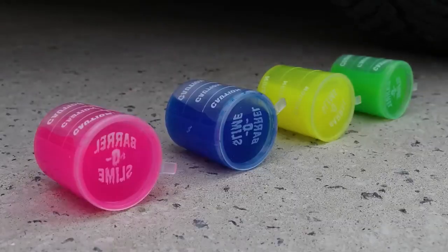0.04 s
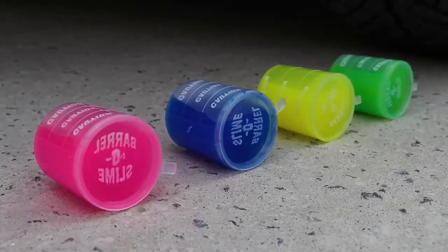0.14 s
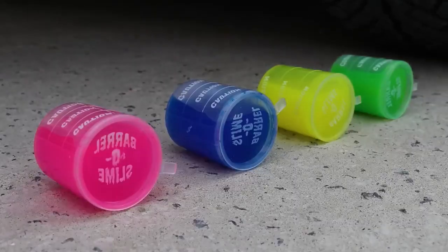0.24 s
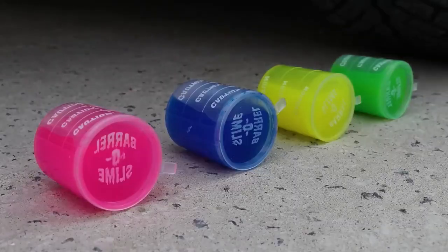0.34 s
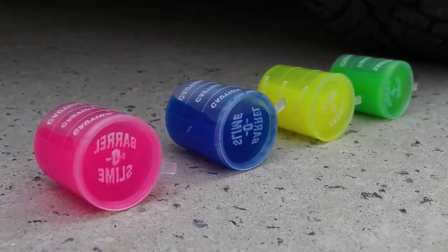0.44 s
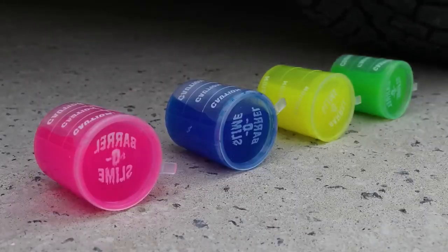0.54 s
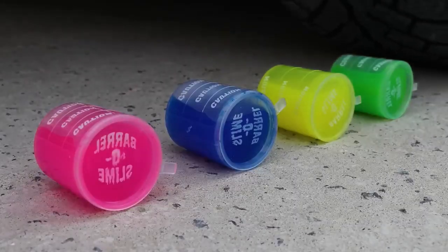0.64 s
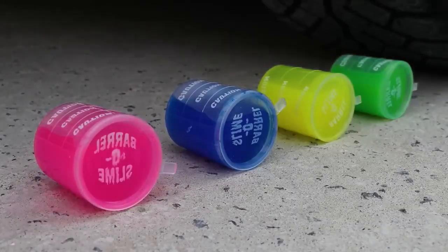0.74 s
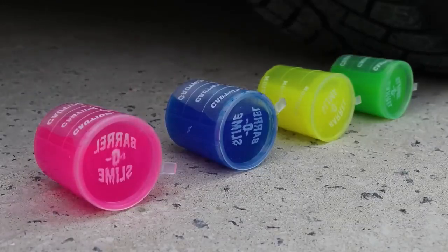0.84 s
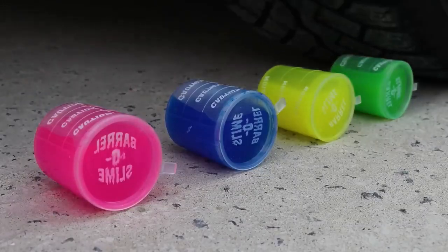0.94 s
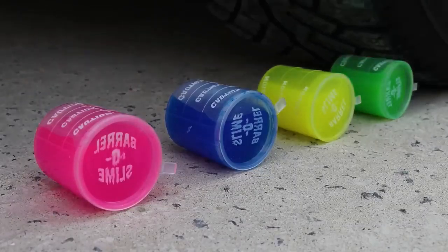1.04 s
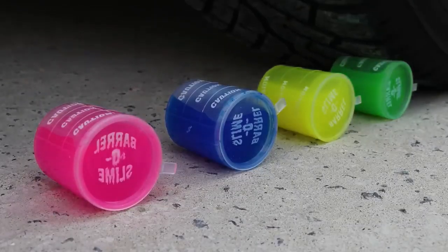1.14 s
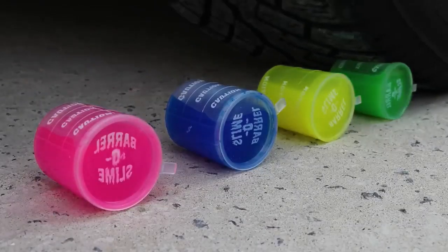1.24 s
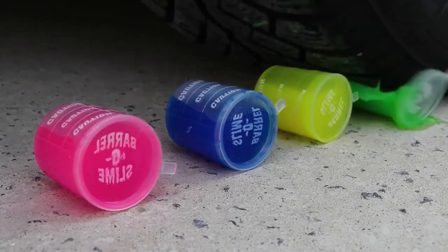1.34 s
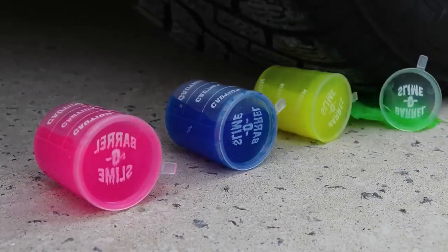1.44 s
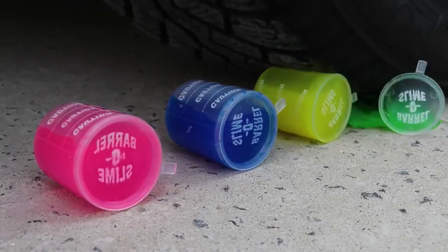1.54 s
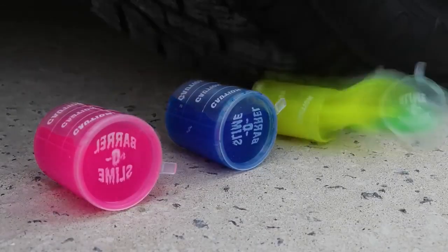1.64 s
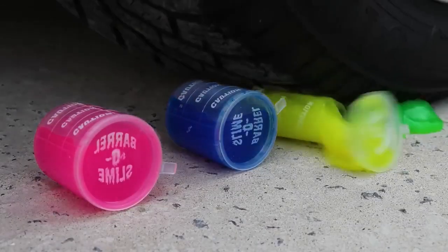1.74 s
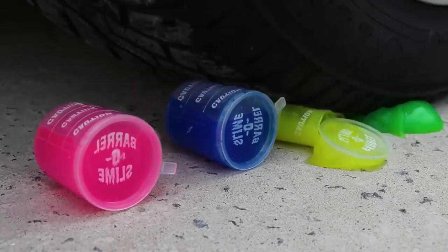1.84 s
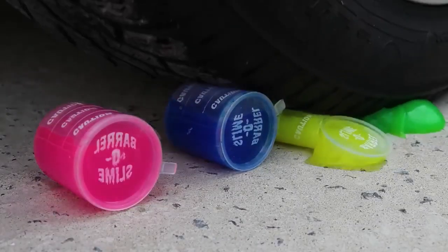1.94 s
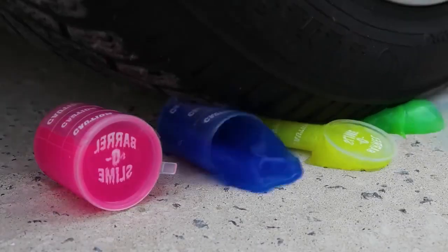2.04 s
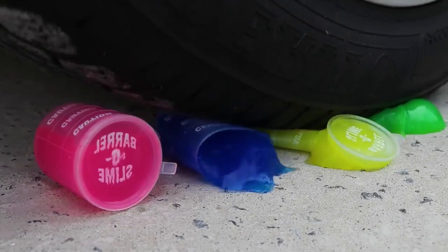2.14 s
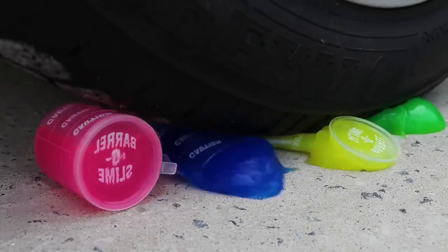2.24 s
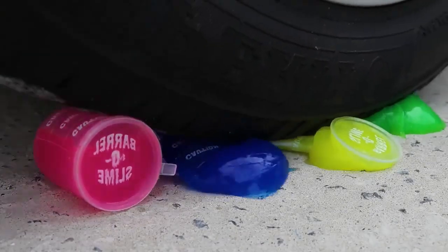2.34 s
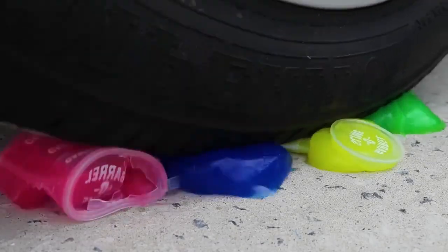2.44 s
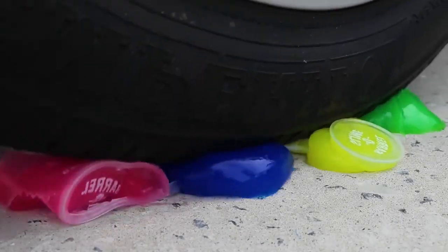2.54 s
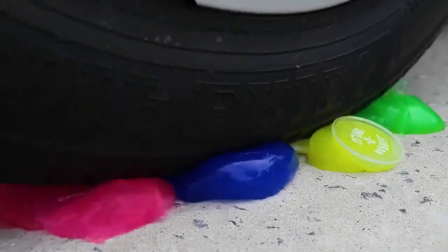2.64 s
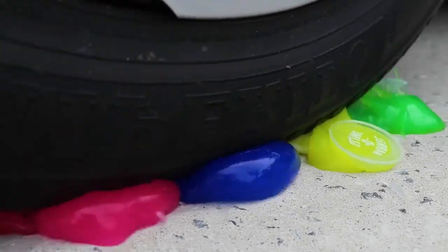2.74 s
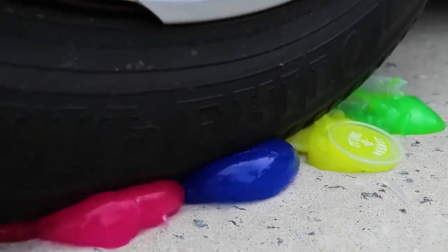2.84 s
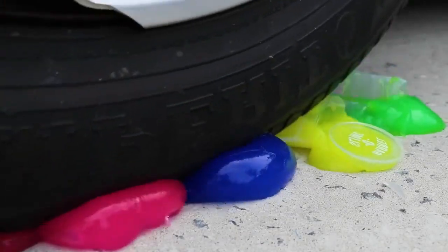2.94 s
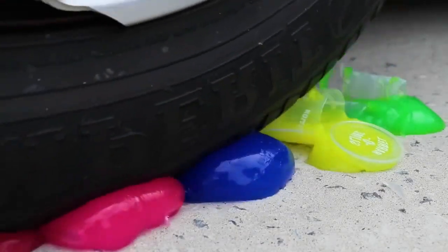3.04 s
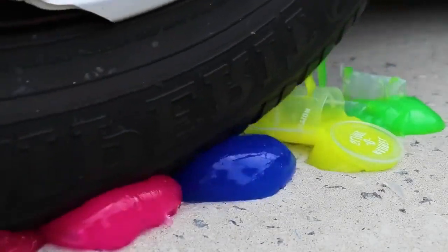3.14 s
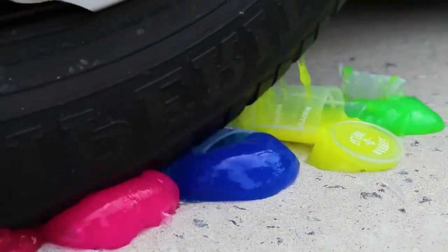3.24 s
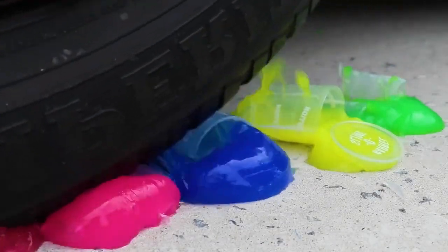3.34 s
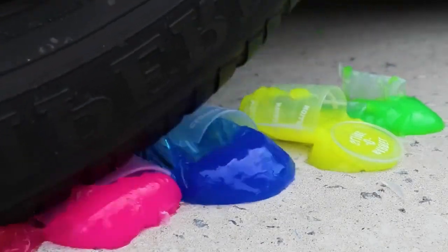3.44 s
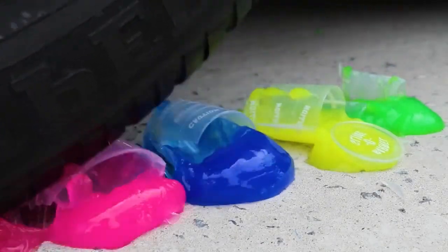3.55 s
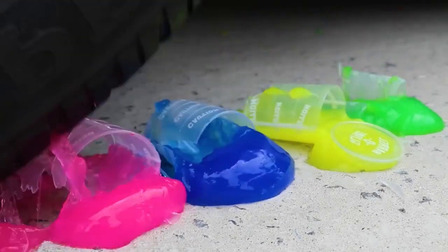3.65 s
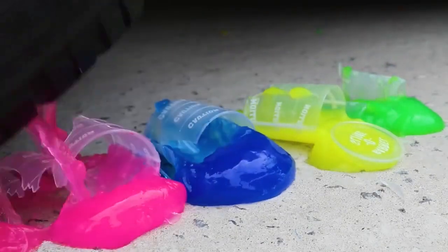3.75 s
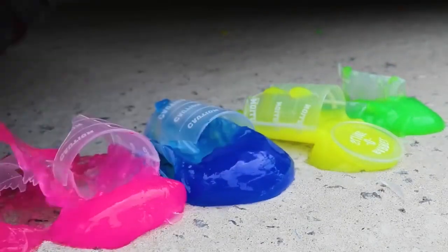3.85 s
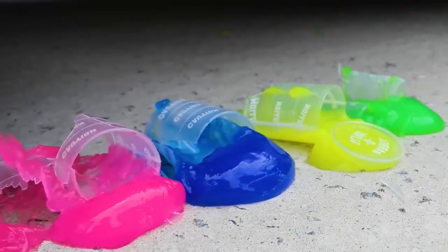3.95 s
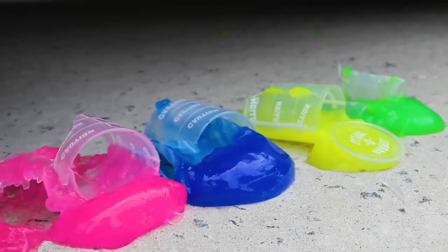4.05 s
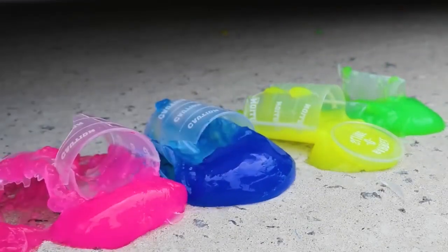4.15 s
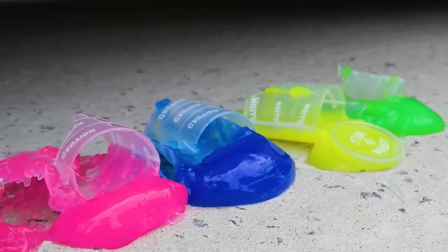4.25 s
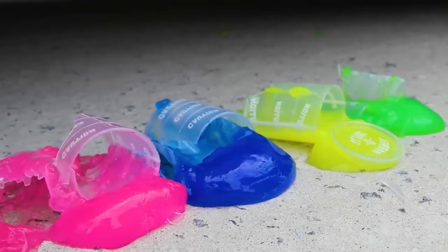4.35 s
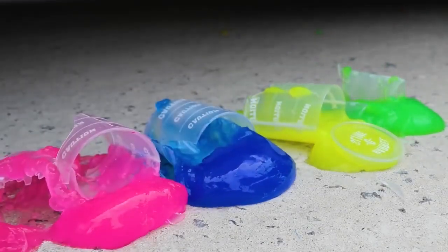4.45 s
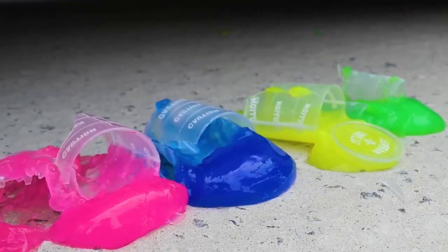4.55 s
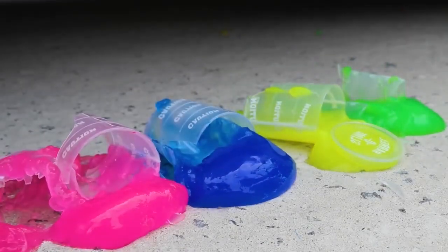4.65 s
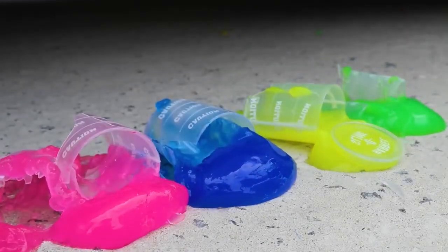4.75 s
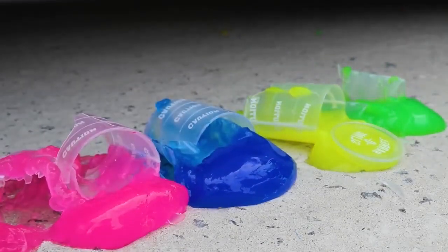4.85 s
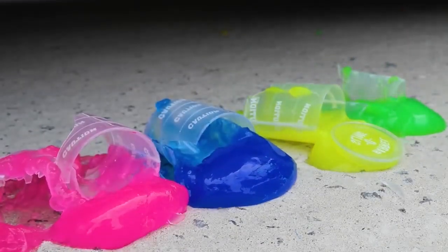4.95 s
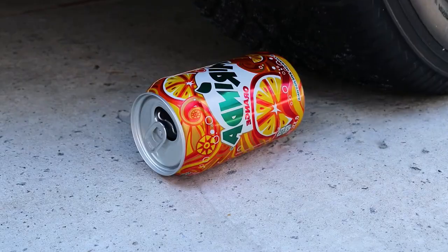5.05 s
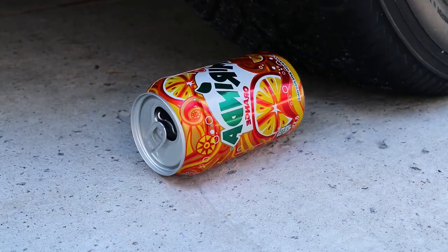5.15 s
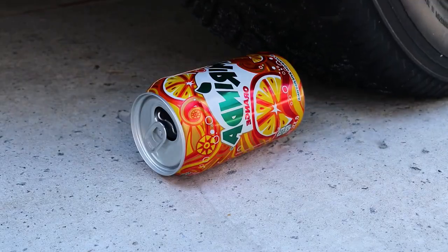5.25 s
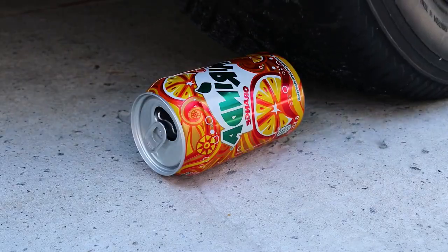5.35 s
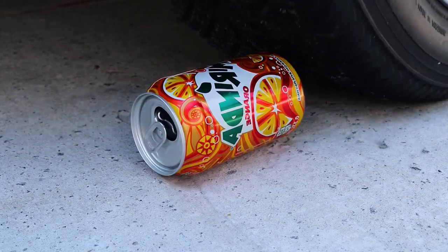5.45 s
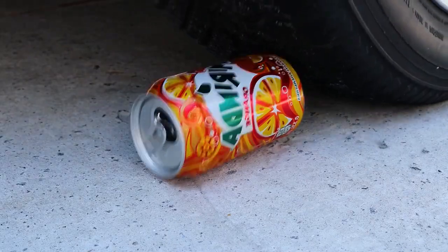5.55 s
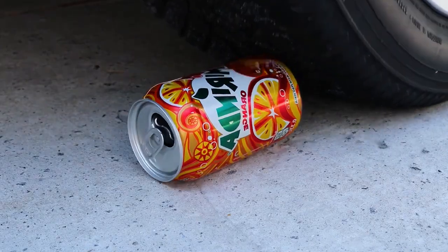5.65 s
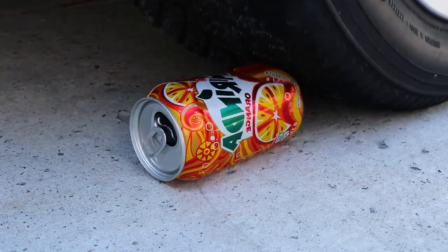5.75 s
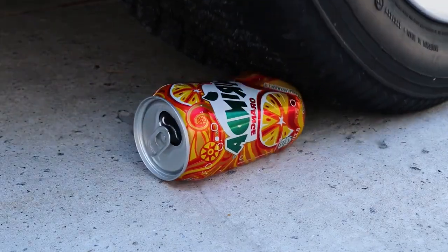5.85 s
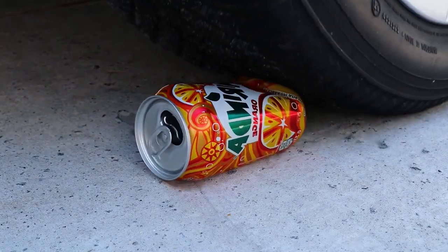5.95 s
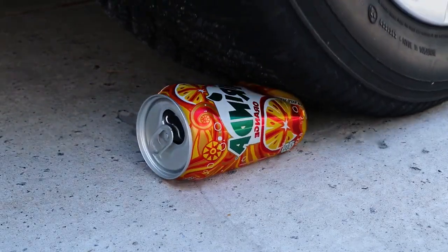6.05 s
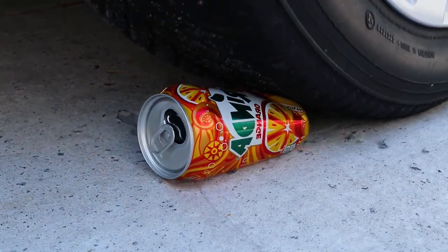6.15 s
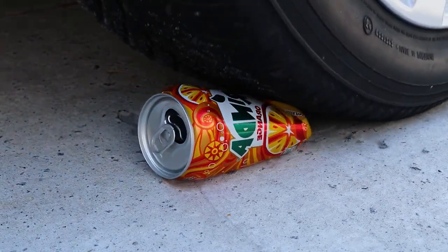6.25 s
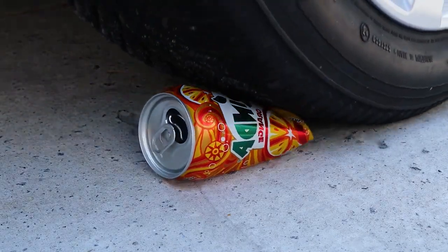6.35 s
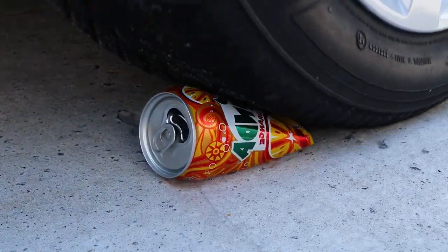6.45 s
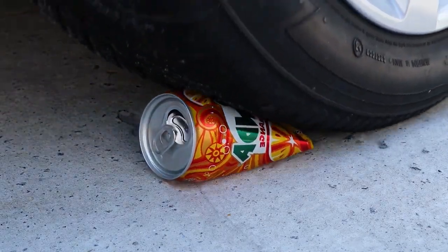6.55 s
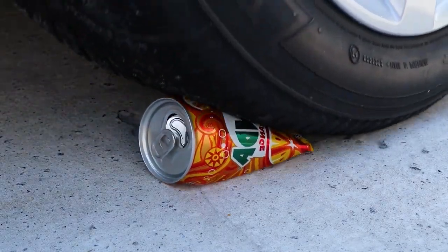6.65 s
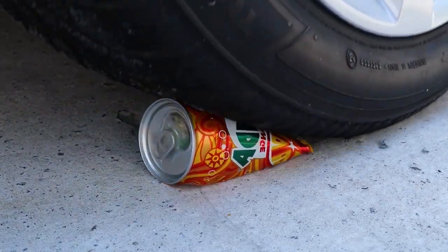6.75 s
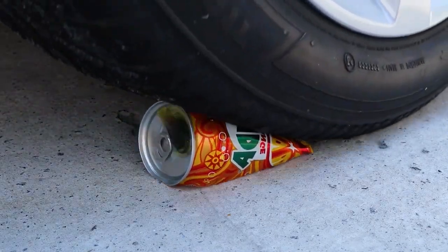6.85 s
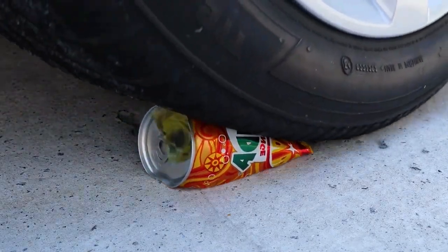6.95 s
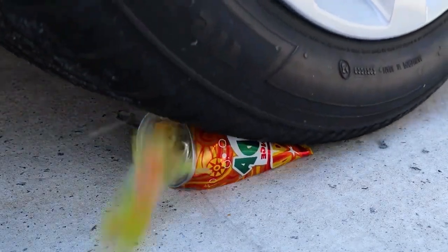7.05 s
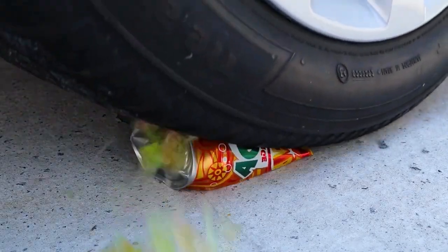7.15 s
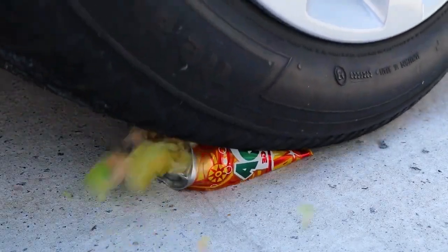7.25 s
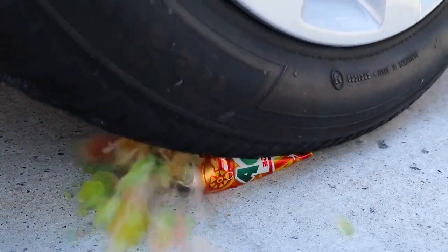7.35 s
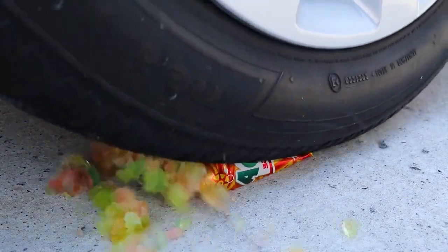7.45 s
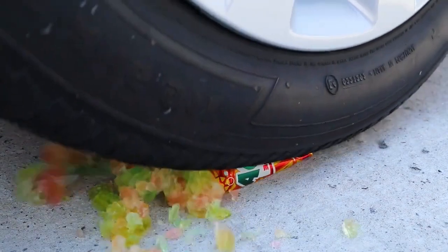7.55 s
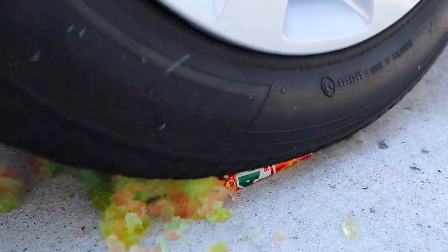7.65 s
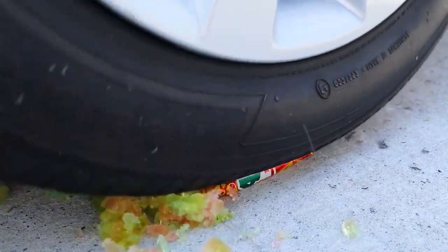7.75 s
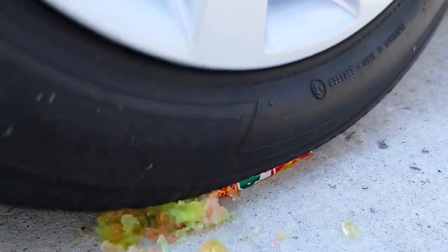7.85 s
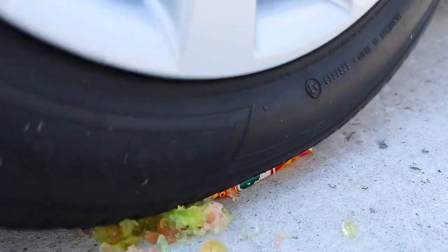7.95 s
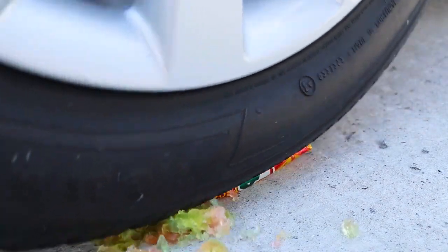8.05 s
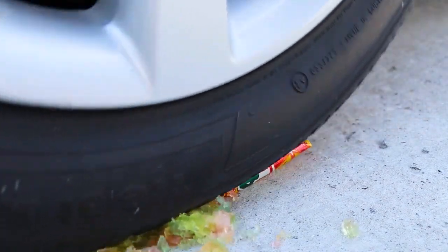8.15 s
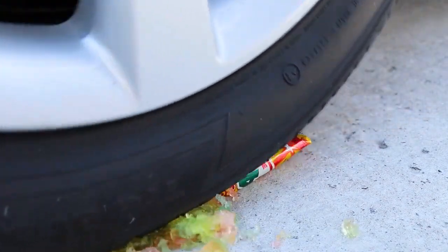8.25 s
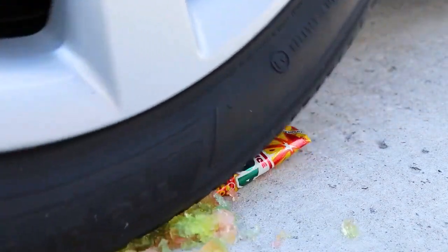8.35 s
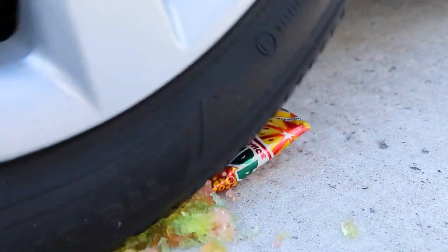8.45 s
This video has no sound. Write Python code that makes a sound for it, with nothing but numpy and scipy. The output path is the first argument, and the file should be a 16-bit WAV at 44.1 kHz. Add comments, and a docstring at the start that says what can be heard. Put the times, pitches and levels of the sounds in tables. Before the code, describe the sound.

A car tyre slowly bursts slime-filled plastic tubs with loud pops and brittle snaps, then after a faded pause crumples a metal can of wet beads.

```python
"""Tyre crushing tubs and a can

A car tyre creeps over slime-filled plastic tubs on concrete, then, after a fade, over a can of jelly beads.
Lids burst as damped thuds and torn noise that shake the tyre's carcass; its air hums on tabled levels.
Plastic snaps and metal buckles are noise clicks with decaying modes; squeezes are dense random grains.
A thin brake squeak, rasps, grit, outdoor air and a short yard tail complete it; loud bursts clip.
"""
import sys
import numpy as np
from scipy import signal
from scipy.fft import rfft, irfft
from scipy.io import wavfile
from scipy.ndimage import uniform_filter1d

SR = 44100
rng = np.random.default_rng(int(sys.argv[2]) if len(sys.argv) > 2 else 0)


def wav_out(sig):
    """Save sig, one row per channel (or a flat mono array), as 16-bit PCM at SR to the path in sys.argv[1]."""
    wavfile.write(sys.argv[1], SR, np.round(np.clip(np.atleast_2d(sig).T, -1, 1) * 32767).astype(np.int16))


N = 375291

# Bursts of lids and can: (t/s, thud level/dB, thud f/Hz, tearing level/dB, tearing length/ms,
# tyre shudder level re thud/dB, push of air level/dB)
BURSTS = [(1.389, -2.5, 376, -2, 4.8, -12.5, -29), (1.783, 0, 411, -2.5, 5, -15.5, -14),
          (2.1333, -3, 377, -1.5, 5.3, -16.5, -9), (2.306, -25.5, 128, -16.5, 5.8, -4, -33),
          (2.537, -2.5, 323, -2.5, 6.4, -14, -5.5), (2.698, -17, 398, -21, 5.5, -11, -36),
          (6.231, -28, 117, -47, 9.8, -13.5, -42), (7.08, -12, 255, -27.5, 4.2, -11.5, -39),
          (7.168, -8.5, 246, -24.5, 7.7, -13.5, -36), (7.378, -10, 270, -27, 8, -12, -45)]
# Carcass modes of the tyre: (f/Hz, level/dB, t60/s)
CARCASS_MODES = [(91, -11.5, 0.2), (126.3, -7, 0.36), (170, -2, 0.14), (271.6, -3.5, 0.18), (918, 9, 0.026)]
PUSH_S = 0.0028  # time constant of the push of air
# Snaps of the tub walls: (t/s, peak level/dB, ring f/Hz, treble level re peak/dB)
SNAPS = [(1.204, -36, 690, -3.5), (1.266, -37.5, 900, -2), (1.4173, -14, 1630, -8), (1.525, -12, 1660, -11),
         (1.5318, -8.5, 1660, 5.5), (1.5552, -19, 3740, -4.5), (1.6243, -28, 3120, 6),
         (1.76, 0.5, 1860, -36.5), (1.8426, -14.5, 1900, -17), (1.906, 1, 2460, 1),
         (1.9188, -0.5, 2260, -1), (1.9687, -18, 1440, -34.5), (1.9951, -6, 2100, -5.5),
         (2.0342, -12, 1780, -11), (2.0864, -11, 950, -6.5), (2.106, -12.5, 1250, -23.5),
         (2.1613, 5, 2580, 1.5), (2.267, -18.5, 2200, 0), (2.273, -8, 1940, -20), (2.2953, -24, 2020, 4.5),
         (2.3073, 2.5, 2470, 4), (2.4669, -9, 3300, -27.5), (2.523, -10, 2330, -6.5),
         (2.567, -11.5, 2050, -1.5), (2.6119, -16, 2700, 3), (2.6868, -10, 1630, -3),
         (2.697, -5.5, 2370, 6), (2.7148, -13, 2600.0, -17.5), (2.755, -1, 4730, -24.5),
         (2.7765, -23, 3470, -13.5), (2.8021, -4, 1540, 1.5), (2.8904, -2, 1940, -8.5),
         (2.9457, -21, 5260, -12.5), (2.9722, -22, 4600, -5.5), (2.9936, -2, 2100, -0.5),
         (3.0879, 0.5, 3040, -27.5), (3.1099, -19.5, 2400, -22), (3.118, -18, 2530, -11),
         (3.139, -23, 3470, -15), (3.1695, -25, 1720, -18.5), (3.177, -14, 2020, -14),
         (3.199, -25, 2620, -10), (3.2203, -24, 2400, -5), (3.24, -28.5, 1640, 1),
         (3.295, -23.5, 2370, -5.5), (3.3033, -25, 2670, -4), (3.3478, -35, 1650, 7.5),
         (3.3932, -16, 2140, 3), (3.4315, -23, 3600, -2), (3.4386, -9.5, 1780, -6.5),
         (3.445, -13, 2840, -13), (3.469, -22.5, 4800, 3.5), (3.499, -30, 3740, 8.5),
         (3.5449, -25.5, 1650, -26), (3.5886, -16, 1480, -13.5), (3.621, -27, 1220, -35),
         (3.7, -35.5, 2190, 2), (4.094, -35, 2920, -4.5)]
TUB_T60_S, TICK_T60_S = 0.0087, 0.0076
# Buckles of the can wall: (t/s, click peak level/dB, click centre f/Hz, shell ring level re click/dB)
BUCKLES = [(5.646, -46.5, 1950, 2), (5.682, -38.5, 2010, 4.5), (5.7157, -45.5, 1690, 18.5),
           (5.728, -16.5, 2800, -15), (5.7378, -11, 1980, -8.5), (5.7734, -2.5, 2620, -17.5),
           (5.8552, -13.5, 1720, -17), (5.8934, -17, 5500, -19), (5.914, -29, 1970.0, -7),
           (5.9479, -7.5, 3400, -15), (6.0226, -36.5, 2330, 7), (6.21, -26.5, 1790, -6.5),
           (6.254, -30.5, 2600, -11.5), (6.337, -27, 4640, -20.5), (6.487, -35, 2620, -3),
           (6.5146, -5, 5800, -12.5), (6.5461, -23, 2380, 2), (6.6274, -2, 3700, -15),
           (6.653, -18, 5070, -16), (6.6788, -22.5, 4580, -15), (6.7683, -25.5, 5200, -7),
           (6.8472, -14.5, 3340, -7.5), (6.8955, -13.5, 3620, -20), (6.9414, -19.5, 6600, -34),
           (6.9536, -20.5, 6930, -40), (7.0356, -19, 6900, -23), (7.0656, -18.5, 1820, 2),
           (7.0846, -17.5, 4750, 0), (7.1106, -11, 3780, -6), (7.239, -24, 5800, -22),
           (7.3784, -12.5, 1880, 4), (7.456, -19, 5000, -33), (7.5563, -26, 5600.0, -8.5),
           (7.8081, -32, 2220.0, 5.5), (7.8467, -31, 5000, -10), (7.882, -7.5, 4060, -12),
           (7.8953, -17.5, 2550, -1.5), (7.9624, -17, 1720, 5.5), (7.9905, -21.5, 2800, -5),
           (8.2576, -23.5, 5700, -31), (8.3213, -26.5, 2820, -32), (8.491, -22, 3330, -16)]
# Shell ring as the can flattens: (t/s, f/Hz, t60/s)
CAN_SHELL = [(5.599, 617, 0.068), (5.78, 698, 0.074), (6.02, 797, 0.038), (6.499, 1064, 0.03),
             (6.65, 1374, 0.019), (6.849, 786, 0.006), (7.9, 1030, 0.0059)]
# Stiffer modes of the can ends: (f/Hz, level re click/dB, t60/s)
CAN_END_MODES = [(2390, -14.5, 0.046), (4730, -17, 0.018)]
# The flattened can slips off the tread in jerks: (t/s, jerk rate/(1/s), gain level/dB)
CREAK = [(8.122, 82, -24), (8.16, 106, -21), (8.185, 198, -29), (8.215, 470, -34), (8.23, 280, -47)]
# Fine crackle as the tread squeezes: (peak t/s, crunch level/dB, wet fizz level/dB, decay/(dB/s))
SQUEEZES = [(1.43, -36.5, -58, 65), (1.88, -30.5, -48, 190), (1.96, -35, -45.5, 200), (2.17, -62, -52, 64),
            (2.29, -34, -36.5, 300), (2.56, -34, -46, 125), (2.762, -30, -37, 189), (2.9, -56, -53.5, 30),
            (3.12, -52, -54, 47), (3.422, -39.5, -47.5, 168), (3.7, -48, -68.5, 168.5),
            (5.729, -42, -55, 52), (5.9, -46.5, -47, 83), (6.31, -61, -57.5, 109.5),
            (6.65, -44.5, -46, 128), (7.095, -41, -37, 291), (7.303, -45, -46, 81), (7.39, -49, -38.5, 75),
            (7.649, -47, -48.5, 34), (8.13, -39.5, -48, 96), (8.27, -56, -52.5, 36)]
# Colours of grain: (low f/Hz, high f/Hz, share of fizz 0-1, relative level/dB); band() caps the high edge
GRAINS = [(454, 1250, 0, -0.5), (1300, 2500, 0.06, -2.5), (2600, 4400, 0.7, -5), (4500, 6900, 1, -1),
          (7000, 10000, 1, -4), (10100, 42000, 0.92, -3.5)]
BUILD_UP_DB_PER_S = 328.5
# Levels of the hum in the tyre's air, where it swells or drops, decaying in between:
# (t/s, level/dB of each mode)
HUM_LEVELS = [(1.39, -28.5, -31, -30), (1.78, -36, -25, -28.5), (1.91, -46, -39.5, -44.5),
              (2.13, -35, -27, -30.5), (2.3, -47.5, -48, -46), (2.53, -41, -32.5, -27),
              (2.69, -48, -46, -35), (2.951, -59, -44, -50), (5.769, -63, -52.5, -52),
              (6.03, -78, -75.5, -80), (7.07, -59, -36, -38), (7.17, -31.5, -39, -40),
              (7.23, -60, -44.5, -48), (7.38, -43, -47.5, -47), ]
# Air modes in the tyre, the lowest split by the load: (f/Hz, t60/s, waver/Hz)
AIR_MODES = [(234, 1.4, 3.0), (247.4, 2.1, 3.), (475.6, 0.5, 9.)]
HUM_SLEW_S = 0.035
# Rasps of rolling tread, squelching slime and creased metal:
# (peak t/s, level/dB, decay/(dB/s), centre f/Hz, width f/Hz)
RASPS = [(.98, -66, 12, 2130, 150), (3.278, -38, 500, 1000, 800), (6.315, -52, 140, 8700, 800),
         (8.464, -39, 700, 1625, 560)]
# Swells of the brake squeak: (peak t/s, level/dB, decay/(dB/s))
SQUEAK = [(4.515, -46, 400), (4.6, -38.5, 150), (4.71, -50, 330)]
SQUEAK_HZ = 12283.0
# Bright ticks of grit and thin creases under the tread: (t/s, peak level/dB)
GRIT = [(.5392, -40), (1.099, -41), (1.5185, -22), (2.2446, -25), (2.9273, -25.5), (3.229, -26),
        (3.41, -20), (5.3448, -48), (5.5586, -46), (5.6586, -39), (6.097, -38), (6.1364, -37), (6.221, -36),
        (6.2926, -37), (6.4478, -33), (6.5625, -32.5), (6.594, -30), (6.7234, -34), (6.878, -31),
        (7.0512, -28), (7.3435, -31)]
# Outdoor air with the idling car, fading out and in between the scenes:
# (t/s, air level/dB, wind rumble level/dB)
AIR_LEVELS = [(0, -60, -76), (.6, -59, -68), (1.3, -59.5, -57), (3.6, -56, -57), (4.0, -54.5, -59.5),
              (4.4, -53, -63), (4.75, -55.5, -67.5), (5.03, -74, -86.5), (5.2, -64.5, -75.5),
              (5.6, -60.5, -76.5), (7.0, -56, -70.5), (8.51, -51.5, -100)]
# Relative spectrum of the outdoor air: (f/Hz, density level/dB per Hz)
AIR_SPECTRUM = [(41, -14), (70, -1.5), (274, -5), (394, -4.5), (593, -8.5), (853, -8), (1470, -7.5),
                (3820, -20), (7060, -23), (16000, -36.5)]
# Thin whines of the idling car:
# (f/Hz, width f/Hz, level re air/dB in the first scene, the same in the second)
WHINES = [(2120, 190, -12.5, -25.5), (10540, 12, -24.5, -52)]
SECOND_SCENE_S = 5.03
YARD_T60_S, YARD_DB, YARD_HZ = 0.27, -25.5, 4800
TOP_HZ = 16350


def undb(db):
    """Level definition: amplitude ratio from decibels."""
    return 10 ** (np.asarray(db) / 20)


def unit(x):
    """Normalisation to unit root-mean-square amplitude."""
    return x / np.sqrt(np.mean(x ** 2))


def peak(x, db):
    """Normalisation of the largest amplitude to a peak level."""
    return x * undb(db) / abs(x).max()


def band(x, lo_hz, hi_hz):
    """Band-pass filtering, with the upper edge kept below the Nyquist limit."""
    edges = [lo_hz, min(hi_hz, .45 * SR)]
    return signal.sosfilt(signal.butter(2, edges, "band", fs=SR, output="sos"), x)


def fade(s, t60):
    """Exponential damping: amplitude falls 60 dB in t60 seconds."""
    return np.exp(-np.log(1000) * s / t60)


def sine(hz, s):
    """Simple harmonic motion of unit amplitude."""
    return np.sin(2 * np.pi * hz * s)


def add(track, at_s, sound):
    """Superposition of a sound on a track from a given time."""
    i = int(at_s * SR)
    track[i:i + len(sound)] += sound[:N - i]


def walk(rate):
    """Slow random modulation: levels held for 1 / rate seconds and slewed twice."""
    k = int(SR / rate)
    steps = np.repeat(rng.standard_normal(N // k + 1), k)
    return uniform_filter1d(uniform_filter1d(steps, k), k)[:N]


def curve(table, column):
    """Level interpolation in dB over time, -120 dB outside the table."""
    s, rows = np.arange(N) / SR, np.array(table)
    out = np.full(N, -120.0)
    on = (s >= rows[0, 0]) & (s <= rows[-1, 0])
    out[on] = np.interp(s[on], rows[:, 0], rows[:, column])
    return uniform_filter1d(out, 441)  # 10 ms smoothing


def swells(at_s, db, fall):
    """Energy summation in dB of swells that rise and decay at steady rates in dB per second."""
    s = np.arange(0, N + 100, 100)[:, None] / SR
    late = s - np.asarray(at_s)
    level = db - np.where(late > 0, late * fall, -late * BUILD_UP_DB_PER_S)
    total = 10 * np.log10(np.sum(undb(2 * level), axis=1) + 1e-14)
    return np.interp(np.arange(N) / SR, s[:, 0], total)


def ragged(noise, count=90):
    """Intermittent fracture: an uneven gain in steps of about 2 ms."""
    return np.repeat(np.minimum(noise[::count] ** 2, 3), count)[:len(noise)]


def click(noise, s, hz, t60, below=.45, above=2.2):
    """Impulsive fracture: band noise around hz with a fainter crumbling tail."""
    crumble = 0.089 * ragged(noise) * fade(s, 7.9 * t60)
    return band(noise * (fade(s, t60) + crumble), below * hz, above * hz)


def tone(hz, db, waver=0.):
    """Frequency modulation: a sine on a level curve whose pitch wavers by a few Hz."""
    phase = 2 * np.pi * np.cumsum(hz + waver * walk(22)) / SR
    return np.sqrt(2) * undb(db) * np.sin(phase)


def bursts():
    """Pressure release: a push of air, a damped thud, tearing noise and excited carcass modes."""
    out, s = np.zeros(N), np.arange(SR // 2) / SR
    noises = rng.standard_normal((len(BURSTS), 2, len(s)))
    for (at_s, db, hz, tear_db, tear_ms, shudder_db, push_db), noise in zip(BURSTS, noises):
        # a thud lasts a few cycles; higher-pitched thuds are rougher
        rough = hz / 309.0 * unit(band(noise[0], .5 * hz, 4.46 * hz)) * fade(s, 0.045)
        thud = fade(s, 15.0 / hz) * sine(hz, s) + rough
        # the carcass modes are shaken unevenly, so each is part tone, part narrow noise
        shudder = np.zeros(len(s))
        for f, level_db, t60 in CARCASS_MODES:
            mode_tone = np.sin(2 * np.pi * (f * s + rng.random()))
            mode_noise = 1.3 * unit(band(noise[1], .8 * f, 1.2 * f))
            shudder += undb(level_db) * fade(s, t60) * (mode_tone + mode_noise)
        shudder *= 1 - fade(s, 0.033)  # gradual onset
        push = (1 - s / PUSH_S / 2) * s / PUSH_S * np.exp(1 - s / PUSH_S)
        # tearing holds its level, then drops to a duller, splashy tail
        hold = np.exp(-(1e3 * s / tear_ms) ** 3) * (1 - fade(s, .004))
        splash = (0.16 * fade(s, 0.12) + 0.011 * fade(s, 0.62)) * (0.68 + 0.47 * ragged(noise[0]))
        tear = unit(band(noise[1], 1400, 16000) + 3.0 * band(noise[1], 780, 1900)) * hold
        tear += unit(band(noise[0], 1200, 8700)) * splash
        body = undb(db) * band(thud + undb(shudder_db) * shudder, 63.0, 13000)
        add(out, at_s, body + undb(tear_db) * tear + undb(push_db) * push)
    return out


def snaps():
    """Brittle fracture: a few cycles of the plastic wall inside a broad click, plus a bright tick."""
    out, s = np.zeros(N), np.arange(3072) / SR
    noises = rng.standard_normal((len(SNAPS), 2, len(s)))
    for (at_s, db, hz, treble_db), noise in zip(SNAPS, noises):
        wall = click(noise[0], s, hz, TUB_T60_S, above=1.7)
        wall += 1.7 * fade(s, 13.0 / hz) * sine(hz, s)
        # another panel rings up to an octave away
        panel_hz = hz * 2 ** np.tanh(noise[1, -1])
        wall += .5 * fade(s, 0.0069) * sine(panel_hz, s)
        tick = click(noise[1], s, 5200.0, TICK_T60_S, below=0.58, above=1.78)
        add(out, at_s, peak(band(wall, 0.17 * hz, 14000), db) + peak(tick, db + treble_db))
    return out


def buckles():
    """Shell instability: a dry wide click excites the can wall, a dented neighbour mode and the ends."""
    out, s = np.zeros(N), np.arange(4096) / SR
    when, pitch, decay = np.transpose(CAN_SHELL)
    noises = rng.standard_normal((len(BUCKLES), 2, len(s)))
    for (at_s, db, hz, ring_db), noise in zip(BUCKLES, noises):
        shell_hz = np.interp(at_s, when, pitch)
        shell_t60 = np.interp(at_s, when, decay)
        dent_hz = shell_hz * (1 + 0.188 * noise[0, -1])
        modes = sine(shell_hz, s) + 0.66 * sine(dent_hz, s)
        ring = fade(s, shell_t60) * modes * (1 - fade(s, 0.0031))
        ring += click(noise[1], s, shell_hz, 0.028, below=0.58, above=1.48)
        snap = click(noise[0], s, hz, 0.0063, below=0.28, above=1.86)
        for f, level_db, t60 in CAN_END_MODES:
            snap += undb(level_db) * click(noise[1], s, f, t60, below=0.96, above=1.022)
        add(out, at_s, peak(snap, db) + peak(ring, db + ring_db))
    return out


def creak():
    """Stick-slip friction: each jerk is a knock in the metal sheet with a short rasp behind it."""
    s = np.arange(N) / SR
    when, jerks, _ = np.transpose(CREAK)
    rate = np.interp(s, when, jerks) * (s >= when[0])
    cycle = (np.cumsum(rate) / SR + .38) % 1
    since = cycle / np.maximum(rate, 1)  # seconds since the last jerk
    rasp = (fade(since, .006) + .03) * (2.5 + rng.standard_normal(N))
    return undb(curve(CREAK, 2)) * (band(rasp, 1000, 4200) + 0.9 * band(rasp, 560, 1000))


def breaks(rate=150., scatter_db=5.5):
    """Poisson process: random breaks (rate per second) of uneven strength, each a decaying envelope."""
    strength = undb(scatter_db * np.minimum(rng.exponential(size=N), 3.0))
    hits = (rng.random(N) < rate / SR) * strength
    return signal.fftconvolve(hits, fade(np.arange(400) / SR, 0.0088))[:N]


def crackle(squirt_db=5.5):
    """Crackling noise: tiny breaks over a squirting hiss, shared by all bands or of one colour."""
    at_s, crunch, fizz, fall = np.transpose(SQUEEZES)
    crunch_db, fizz_db = swells(at_s, crunch, fall), swells(at_s, fizz, fall)
    wide, squirts, out = breaks(), walk(40), np.zeros(N)
    for lo_hz, hi_hz, share, db in GRAINS:
        hiss = .27 * undb(squirt_db * (squirts + walk(25)))
        shake = unit(0.57 * wide + breaks()) + hiss
        level_db = db + (1 - share) * crunch_db + share * fizz_db
        out += undb(level_db) * unit(band(shake * rng.standard_normal(N), lo_hz, hi_hz))
    return out


def tyre_hum():
    """Cavity resonance: the air modes swell or drop to tabled levels and decay unevenly in between."""
    s, rows, out = np.arange(N) / SR, np.array(HUM_LEVELS), np.zeros(N)
    last = np.searchsorted(rows[:, 0], s) - 1  # index of the latest row
    slew = int(HUM_SLEW_S * SR)
    for (hz, t60, waver), db in zip(AIR_MODES, rows[:, 1:].T):
        level = np.where(last < 0, -120, db[last] - 60 * (s - rows[last, 0]) / t60)
        # averaging over the past makes each change gradual
        gain = uniform_filter1d(undb(level), slew, origin=int(HUM_SLEW_S * SR / 2) - 1)
        out += gain * tone(hz, 3.3 * walk(16), waver=waver)
    return out


def rasps():
    """Rough sliding contact: narrow-band noise broken into bits."""
    out = np.zeros(N)
    for at_s, db, fall, hz, width in RASPS:
        noise = rng.standard_normal((2, N))
        bits = noise[0] * (0.7 + ragged(noise[1]))
        out += undb(swells([at_s], db, [fall])) * unit(band(bits, hz - width / 2, hz + width / 2))
    return out


def brake_squeak():
    """Friction-driven oscillation: a high wavering sine in swells."""
    return tone(SQUEAK_HZ, swells(*np.transpose(SQUEAK)), waver=6.0)


def ticks(rate=4.4, ticks_db=-18.5):
    """Contact impulses: tabled grit ticks, with fainter random ones (rate per second) re the air level."""
    hits = (rng.random(N) < rate / SR) * rng.random(N) ** 2
    envelope = signal.fftconvolve(hits, fade(np.arange(300) / SR, .004))[:N]
    out = unit(band(envelope * rng.standard_normal(N), 3500, 12000))
    out = out * undb(curve(AIR_LEVELS, 1) + ticks_db)
    s = np.arange(1024) / SR
    for (at_s, db), noise in zip(GRIT, rng.standard_normal((len(GRIT), len(s)))):
        add(out, at_s, peak(click(noise, s, 6500., TICK_T60_S), db))
    return out


def air():
    """Broadband ambient noise: independently flickering bands, thin whines and gusts of wind rumble."""
    hz, db = np.transpose(AIR_SPECTRUM)
    f = np.maximum(np.fft.rfftfreq(N, 1 / SR), 1)
    colour, out = undb(np.interp(np.log(f), np.log(hz), db)), np.zeros(N)
    for centre in np.arange(5.5, 14.5, .75):  # log2 of the band centre in Hz
        window = np.maximum(1 - abs(np.log2(f) - centre) / .75, 0) ** .5
        noise = irfft(rfft(rng.standard_normal(N)) * colour * window, N)
        out += undb(0.42 * walk(9.1)) * noise
    out = unit(out)
    for whine_hz, width, first_db, second_db in WHINES:
        level = np.where(np.arange(N) < SECOND_SCENE_S * SR, first_db, second_db)
        whine = unit(band(rng.standard_normal(N), whine_hz - width / 2, whine_hz + width / 2))
        out += undb(level + 3.8 * walk(2.1)) * whine
    wind = undb(6.6 * walk(3.9)) * unit(band(rng.standard_normal(N), 8.5, 110))
    return out * undb(curve(AIR_LEVELS, 1)) + wind * undb(curve(AIR_LEVELS, 2))


def yard(x):
    """Diffuse reflection: ground, car body and walls return a short dull tail."""
    s = np.arange(int(.6 * SR)) / SR
    echo = band(rng.standard_normal(len(s)), 220, YARD_HZ)
    echo *= fade(s, YARD_T60_S) * (1 - fade(s, 0.045))
    return signal.fftconvolve(x, undb(YARD_DB) * echo / np.sqrt(np.sum(echo ** 2)))[:N]


def scene():
    """Superposition of all sources, with reflections of the bursts, snaps, buckles and creak."""
    hits = bursts() + snaps() + buckles() + creak()
    contact = crackle() + tyre_hum() + rasps() + brake_squeak() + ticks()
    return (hits + yard(hits) + contact + air())[None]


def record(dry):
    """Amplitude limiting: a close microphone's input clips hard, then a low-pass cuts the top."""
    clipped = np.clip(dry, -.88, .88)
    return signal.sosfilt(signal.ellip(10, .2, 80, TOP_HZ, fs=SR, output="sos"), clipped)


dry = scene()
out = record(dry)
wav_out(out)
```